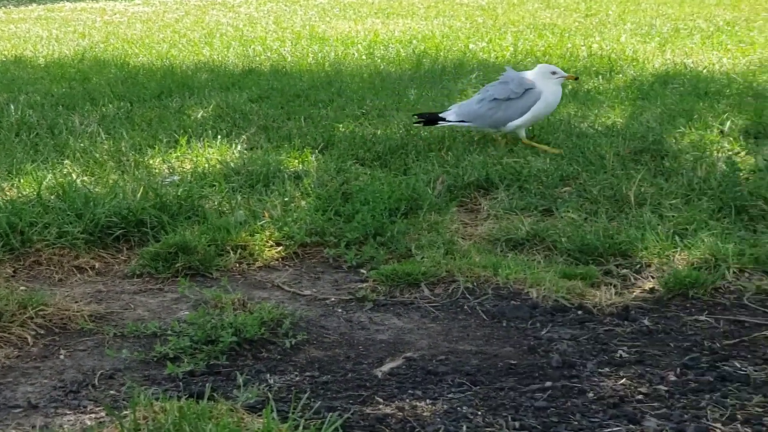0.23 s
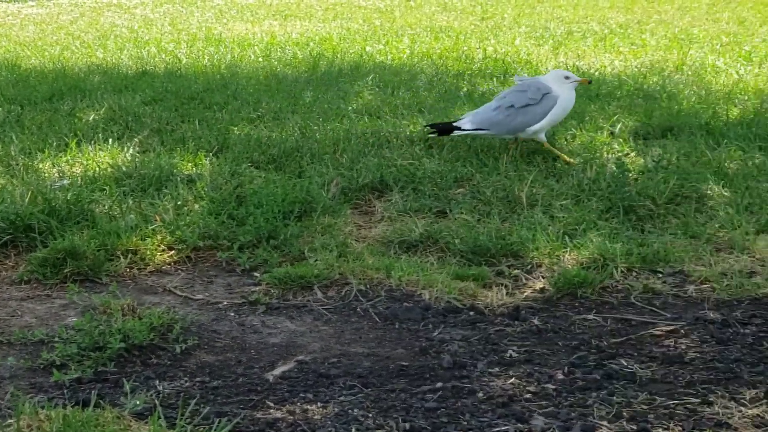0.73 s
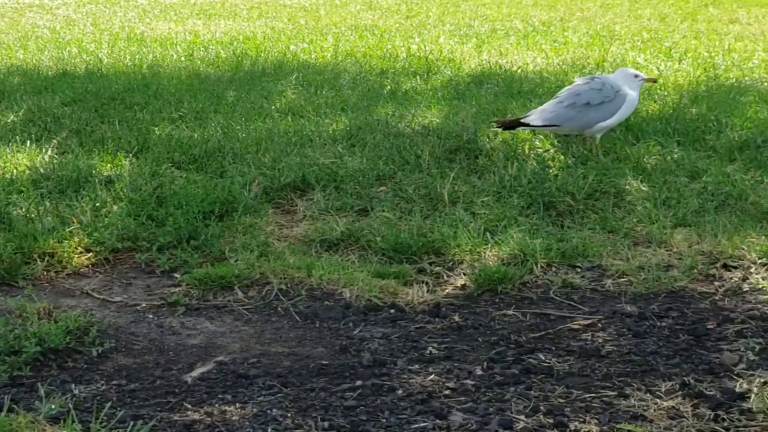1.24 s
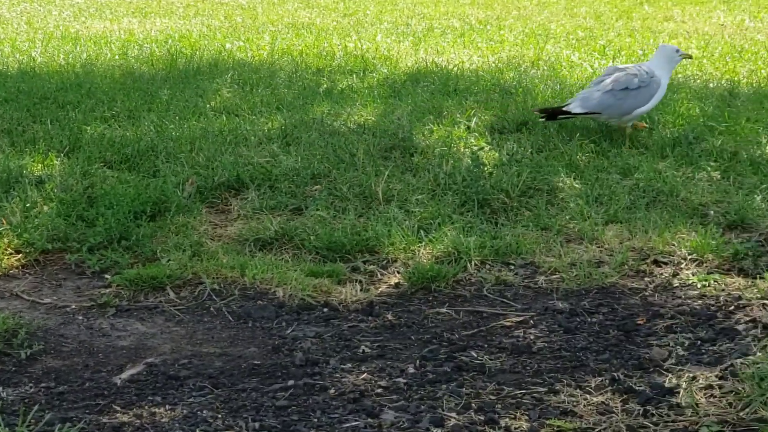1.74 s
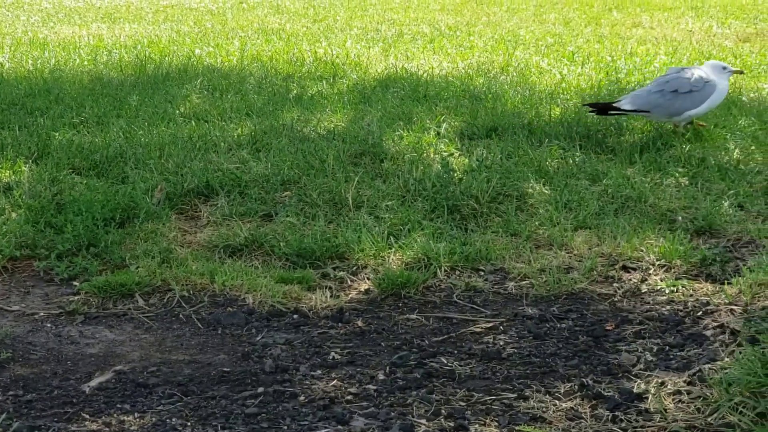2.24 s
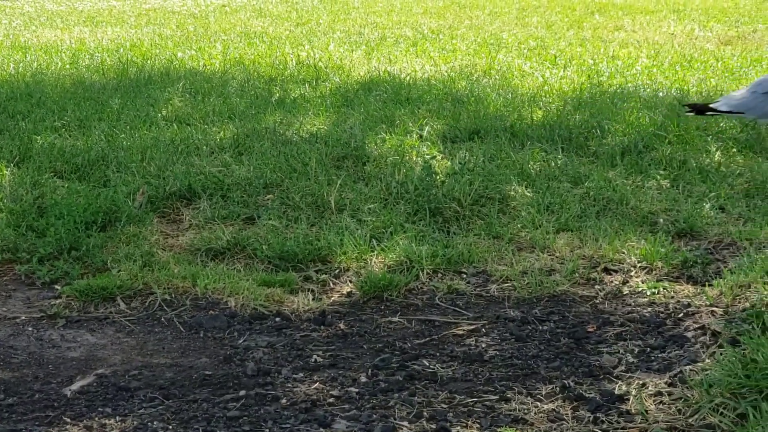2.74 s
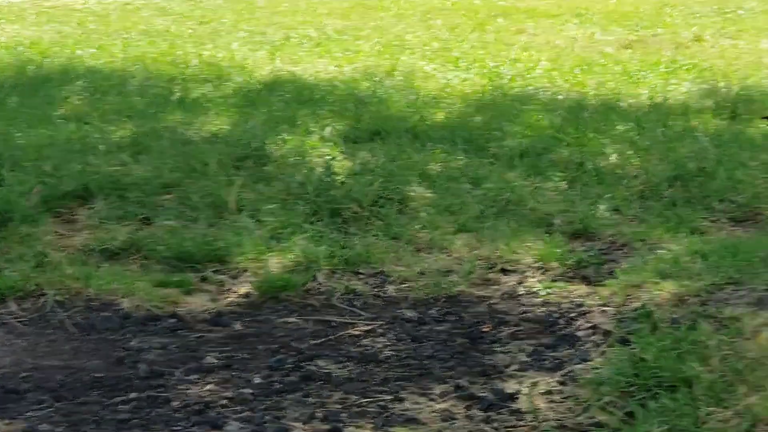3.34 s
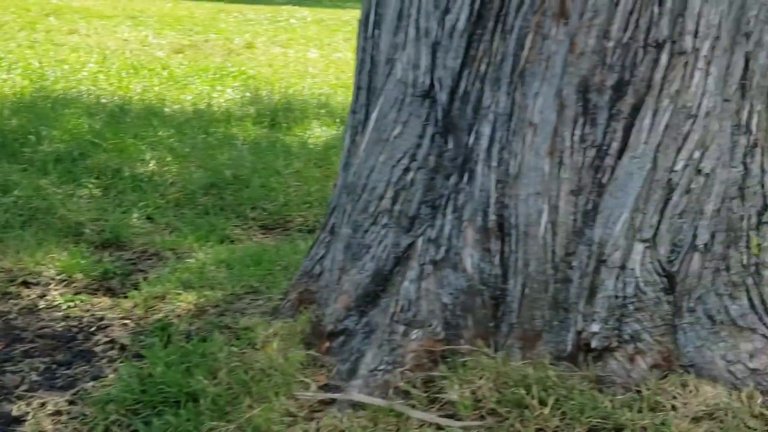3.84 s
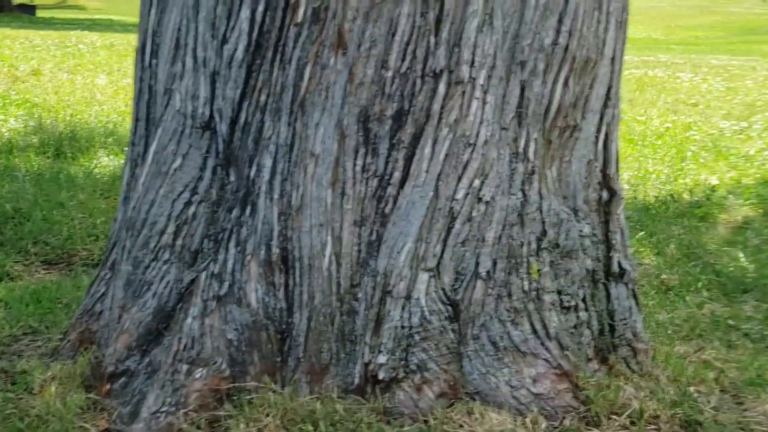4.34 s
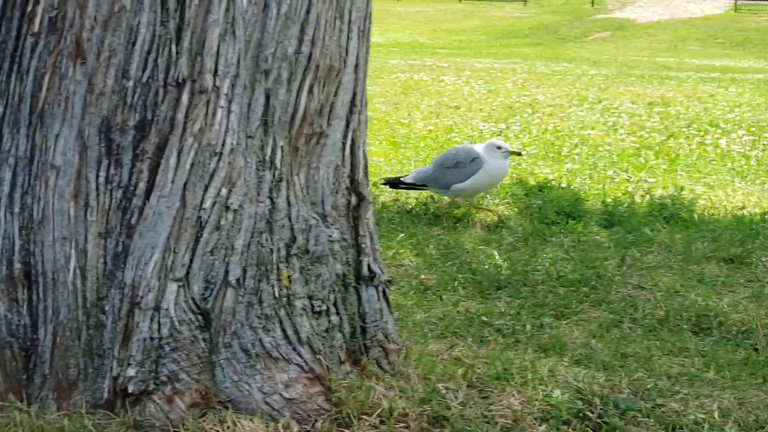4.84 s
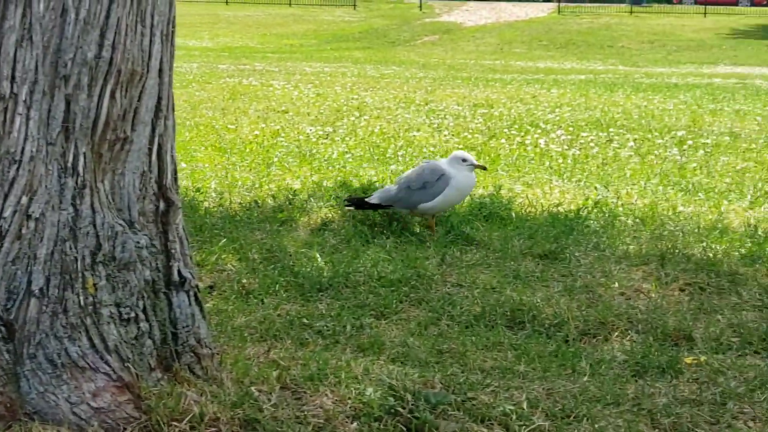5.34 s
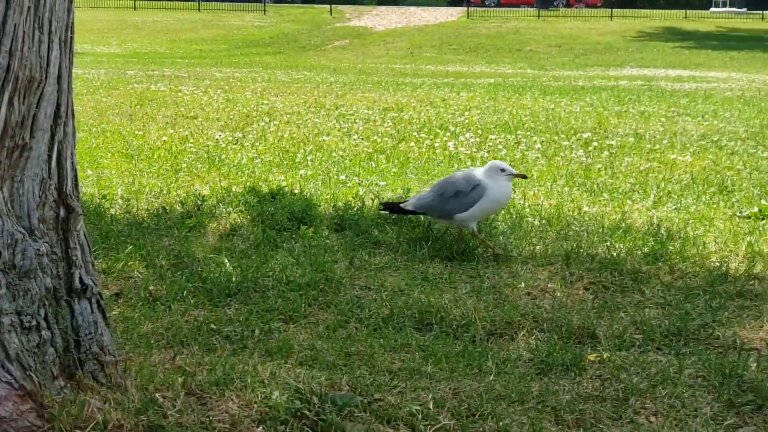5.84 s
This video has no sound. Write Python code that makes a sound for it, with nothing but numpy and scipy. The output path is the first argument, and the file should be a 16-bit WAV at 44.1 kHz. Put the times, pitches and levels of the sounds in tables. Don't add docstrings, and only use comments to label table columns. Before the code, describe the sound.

Wind thumps the microphone on a breezy lawn while sparrows chirp far off and a nearby gull calls twice, briefly, the second call fainter and hoarser.

```python
import sys
import numpy as np
from scipy import signal
from scipy.io import wavfile
from scipy.ndimage import uniform_filter1d

SR = 44100
rng = np.random.default_rng(int(sys.argv[2]) if len(sys.argv) > 2 else 0)


def generate_wav(sig):
    pcm = np.round(np.clip(np.atleast_2d(sig).T, -1, 1) * 32767).astype(np.int16)
    wavfile.write(sys.argv[1], SR, pcm)


def boost(x):
    u = np.asarray(x, float) / 20
    return 10 ** u


N = 268789
TIME = np.arange(N) / SR

# (time [s], pitch [Hz], effort [dB])
GULL_ONSET = [(1.571, 444, -60), (1.582, 478, -52), (1.592, 503, -39), (1.599, 512, -42), (1.603, 530, -46),
              (1.612, 580, -44)]
GULL_RISE = [(1.606, 568, -41), (1.613, 584, -37.5), (1.634, 585, -35.5), (1.641, 643, -40),
             (1.646, 640, -55)]
GULL_CRY = [(1.639, 802, -36.5), (1.661, 770, -35.5), (1.666, 762, -52), (1.671, 753, -34),
            (1.68, 741, -36), (1.688, 731, -53), (1.704, 718.4, -33.5), (1.735, 721, -38),
            (1.748, 765, -36)]
GULL_DROP = [(1.742, 380.5, -43), (1.764, 403.6, -43.5), (1.8, 375.3, -43.5), (1.817, 360, -47),
             (1.835, 356, -44), (1.856, 344, -48), (1.869, 330, -55)]
GULL_FLICK = [(1.843, 700, -50), (1.862, 588, -44), (1.886, 535, -46), (1.892, 572, -47), (1.925, 540, -58)]
GULL_OPENING = [(3.17, 600, -57), (3.19, 670, -50), (3.22, 715, -45), (3.235, 735, -56), (3.255, 750, -52),
                (3.285, 750, -57)]
GULL_MOAN = [(3.22, 378, -46), (3.236, 376, -44), (3.3, 360, -47), (3.34, 342, -43), (3.386, 330, -41),
             (3.422, 330, -49), (3.454, 333, -43.5), (3.48, 330, -55)]
GULL_SINK = [(3.425, 920, -60), (3.468, 840, -49), (3.5, 790, -53)]
GULL_CATCH = [(3.492, 514, -49), (3.503, 499, -47), (3.535, 450, -56)]
# (partial the beak is tuned to [number], treble at the start [dB],
# treble fade [dB/s], even partials [dB], rasp [0-1])
GULL_VOICES = [
    (3.75, 7, 10, -4.5, 0.25),
    (3.05, 5.5, 40, 5.5, 0.2),
    (1.86, 8, 202, 0.5, 0.06),
    (2.8, 0, 35, 3, .07),
    (1.77, -21, 10, 5, 0.45),
    (1.05, -12, 1, 6, .2),
    (3.0, -2, 10, -10, .36),
    (0.92, -18, 1, -7, 0.22),
    (2.27, -18, 100, -3, .1),
]
# (centre [Hz], width [Hz], level [dB])
THROAT_MODES = [(1870, 147, -1), (2470, 130, -18), (2620, 130, -10.5), (3070, 870, -14), (3990, 250, -9.5),
                (4750, 150, -10.5), (5360, 200, -19)]
# (time of the falling note [s], stretch [ratio], top of the opening hook [Hz],
# hook level [dB], fall level [dB])
SPARROW_CHIRRUPS = [(.278, 1.27, 4450, -57, -58), (0.58, 0.83, 4860, -47, -52),
                    (1.377, 1.2, 4800, -63, -57.5), (1.957, 0.85, 4750, -57, -50.5),
                    (2.481, 1.1, 4450, -63, -58), (3.092, 0.75, 5100, -66, -50.5),
                    (3.494, 1.45, 4320, -67, -61), (3.581, 1.3, 4500, -58, -52),
                    (4.335, 1.1, 4480, -65, -50), (4.73, 1.23, 4450, -52, -49),
                    (5.457, 0.9, 4690, -51.5, -49), (6.066, 1.18, 4500, -45.5, -49.5)]
# (start [s], length [s], middle
# pitch [Hz], glide [Hz], level [dB])
FLOCK_NOTES = [(.27, 0.018, 5300, -450, -59), (4.328, 0.017, 5050, -600, -51),
               (0.572, 0.013, 3230, -200, -49), (0.708, 0.05, 4220, 300, -56),
               (.735, 0.055, 4080, 330, -61), (1.409, 0.03, 2990, 262, -51),
               (2.045, 0.016, 4400, 98, -57.5), (1.925, .03, 3980, 48, -59), (3.153, 0.035, 3960, 30, -57),
               (3.19, 0.036, 4680, 230, -56), (3.512, .022, 3200, 100, -48),
               (3.514, 0.058, 2900, -900, -51), (3.478, .035, 3950, -600, -57.5),
               (3.515, .05, 3550, -250, -55), (3.9, .03, 3250, -150, -55), (3.605, 0.022, 3700, -100, -58),
               (3.472, .02, 4150, 300, -59), (3.495, 0.0252, 2600, -500, -60),
               (3.625, 0.023, 3750, -150, -52), (3.714, 0.03, 3530, 195, -56.5),
               (4.128, 0.0089, 4000, -1700, -50.5), (4.145, 0.037, 2450, 170, -56.5),
               (5.2, .013, 3850, 650, -56.5), (4.243, 0.022, 3700, -900, -53),
               (4.288, 0.0072, 3450, 300, -44.5), (4.714, 0.022, 3680, 297, -48.5),
               (4.735, .06, 3050, -950, -49), (4.726, .025, 3950, -900, -49), (4.735, 0.04, 3700, -58, -52),
               (4.795, 0.024, 3750, 400, -61), (4.185, 0.016, 2480, -50, -57),
               (5.614, 0.032, 4050, -81, -54.5), (5.645, 0.03, 4030, 60, -62),
               (5.675, 0.023, 4250, 100, -59), (4.7, .02, 3000, 50, -59), (5.692, 0.0267, 3500, -800, -52),
               (5.69, .02, 5300, 0, -59), (5.395, .025, 2900, -300, -55)]
# (start [s], length [s],
# middle pitch [Hz], glide [Hz], level [dB])
FAR_WHISTLES = [(.345, .115, 3260, 50, -58), (2.675, .125, 3500, -30, -61.5), (2.68, .11, 3200, -30, -63),
                (2.695, .08, 2910, -20, -67), (2.69, .09, 3790, -40, -65), (2.69, .08, 4090, -30, -69),
                (2.805, .21, 4310, 10, -63.5), (2.87, .07, 4320, 0, -72), (2.99, .06, 4300, 0, -72),
                (2.895, .05, 3070, -50, -66), (1.94, .06, 1860, 0, -62)]
# (start [s], end [s], middle pitch [Hz], level [dB])
FAR_TWITTER = [(3.48, 3.56, 3600, -59), (3.59, 3.68, 3700, -57), (4.34, 4.44, 3550, -54.5),
               (4.28, 4.34, 4500, -59), (4.73, 4.82, 3700, -53), (4.4, 4.7, 2500, -65),
               (5.3, 5.42, 2260, -66), (5.45, 5.62, 2900, -57), (5.8, 5.95, 2540, -66),
               (1.93, 2.02, 3700, -58)]
# (time [s], peak [dB], left-right difference [dB])
GRASS_TICKS = [(0.1775, -44, 12.5), (4.1074, -54, 4), (4.1135, -38, 2.5), (4.1295, -41, 6),
               (4.1364, -58, 3), (4.1832, -50, 1.5), (5.3244, -43, 2.5), (5.3844, -49, 3.0),
               (5.4715, -38, 12), (5.5194, -42, 5.5), (5.668, -35, 11), (6.0781, -41, 12)]
# (start [s], end [s], level [dB])
GRASS_RUSTLES = [(4.1, 4.22, -70), (4.324, 4.42, -68), (5.296, 5.55, -71), (5.66, 5.733, -75),
                 (5.797, 5.86, -70), (6.052, 6.091, -67)]
# (time [s], left level [dB], right level [dB])
GUSTS_ON_PORTS = [(0.1, -36, -38.5), (0.36, -29.5, -36), (0.531, -34.5, -39), (0.6, -25.5, -35.5),
                  (0.78, -28, -35), (0.87, -19, -37), (0.94, -19.5, -39), (1.02, -60, -38),
                  (1.55, -44, -39), (1.88, -43.5, -39), (2.3, -35.5, -39.5), (2.51, -70, -39.5),
                  (2.72, -39, -37.5), (3.9, -44.5, -40), (4.4, -38.5, -39.5), (5.5, -37.5, -38.5),
                  (5.87, -49, -42), (6.08, -52, -37)]
# (frequency [Hz], level [dB per Hz])
GUST_COLOUR = [(12, -42), (20, -44), (38, -1), (53, 4.5), (138, -6.5), (210, -11.5), (369, -33), (428, -30),
               (468, -33), (700, -57), (910, -76), (1540, -120)]
# (frequency [Hz], level [dB per Hz])
BREEZE_COLOUR = [(12, -42), (20, -22), (48, 2.5), (68, 2), (242, -10), (443, -28), (500, -25.5), (650, -41),
                 (1100, -120)]
# (time [s], likeness [0-1])
PORT_LIKENESS = [(0, 1), (1.5, 0.47), (3, 0.58), (4, 0.92), (6.09, 1)]
# (time [s], peak [dB], frequency [Hz])
EDDY_SLAPS = [(.565, -17.5, 226), (0.608, -13.5, 108), (0.675, -17.5, 139), (0.701, -19, 166),
              (0.729, -19, 227), (.752, -21.5, 302), (.835, -13.5, 190), (0.854, -14.5, 217), (.9, -14, 71),
              (.924, -17.5, 175), (0.946, -22, 120), (.957, -40, 200), (0.997, -20.5, 125)]
# (time [s], peak [dB], frequency [Hz], left-right [dB])
AIR_PUFFS = [(1.225, -27.5, 93, -1), (1.318, -30, 109, -5), (1.516, -27.5, 98, -1), (1.612, -31, 77, -12),
             (1.848, -25.5, 103, 0), (1.937, -28.5, 85, 1), (2.054, -26.5, 101, -15),
             (2.132, -29.5, 89.6, -1), (2.16, -26, 112, -1), (2.256, -31.5, 126, 1), (2.353, -31, 95, -1),
             (2.692, -29, 106, 1), (2.818, -29.0, 107, 0.5), (2.875, -32, 120, 3), (3.016, -36, 115, 2),
             (3.094, -25.5, 108, -6), (3.166, -25.5, 85.5, -2), (3.247, -27, 105, 2),
             (3.298, -29.5, 129, -4), (3.34, -27, 84.5, -2), (3.504, -32, 120, -1), (3.579, -29.5, 85, 2),
             (3.741, -28.5, 119, 0.5), (4.08, -30, 91, 5), (4.108, -30.5, 102, 1), (4.188, -28.5, 79, 2),
             (4.228, -31, 115, 1), (4.284, -31.0, 162, 0), (4.335, -29.5, 126, 2), (4.389, -32, 97, 2),
             (4.459, -29, 103, 0), (4.494, -28.5, 101, 0), (4.534, -28, 75, 0), (4.586, -27, 85, 0),
             (4.714, -31, 73.6, 0), (4.77, -33, 110, -1), (4.837, -27.5, 100, 0), (4.925, -28, 112, 0),
             (4.975, -36, 113, -10), (5.029, -27, 106, 0), (5.127, -28, 93, 1), (5.174, -31, 95, 3),
             (5.286, -33, 103, 1), (5.414, -33.5, 140, 0), (5.445, -32, 115, 0), (5.483, -35, 111, -2),
             (5.512, -25, 80.5, -1), (5.629, -30, 101, 2), (5.922, -32, 98, 6), (6.018, -29.0, 146, 0.5)]
# (time
# [s], level [dB])
BREEZE_LEVEL = [(0.0, 1.5), (0.71, 5), (0.98, -1), (1.49, -2), (1.75, 0.5), (1.9, -1.5), (2.15, -2),
                (3.07, -2), (3.36, 2.5), (3.51, 2), (4.0, 0.9), (4.24, 2), (5.44, 0.5), (6.0, -1.5)]
# (frequency [Hz], level [dB per Hz])
TOWN_COLOUR = [(150, -7.5), (250, -2), (455, -11.5), (636, -11), (701, -9.5), (1040, -8), (1690, -14),
               (2020, -13), (2750, -15), (3900, -17.5), (4870, -25), (7000, -52), (9100, -45),
               (15400, -120)]
# (frequency [Hz], level [dB per Hz])
ENGINE_COLOUR = [(25, -120), (50, -14), (61, 0), (72, -14), (120, -120)]
# (frequency [Hz], level [dB per Hz])
LEAF_COLOUR = [(2940, -12.5), (5000, 5), (5960, 4), (7110, 3), (8350, 0.5), (9320, -5), (10900, -5),
               (13700, -15), (15600, -20)]
# (time [s], left-right difference [dB])
LEAF_LEAN = [(0, 14.5), (3.4, 9), (3.8, 4.5), (6.09, 8)]
# (frequency [Hz], share [ratio])
LEAN_SHARE = [(5000, 0.11), (8000, 0.86), (15000, 1.9)]

SIDE_LAG = 21


def evened(x):
    return x / np.sqrt(np.mean(x ** 2) + 1e-20)


def read(points, hz):
    f, value = np.transpose(points)
    return np.interp(np.log(hz + 1), np.log(f + 1), value)


def follow(points, t):
    s, *columns = np.transpose(points)
    return np.array([np.interp(t, s, column) for column in columns])


def add(mix, s, sound):
    part = mix[round(s * SR):][:len(sound)]
    part += sound[:len(part)]


def smooth(x, width, axis=-1):
    return uniform_filter1d(uniform_filter1d(x, width, axis=axis), width, axis=axis)


def wobble(count, span):
    return evened(smooth(rng.standard_normal(count), max(int(span), 2)))


def band_noise(count, order, low_hz, high_hz):
    band = signal.butter(order, [low_hz, high_hz], "band", fs=SR)
    return signal.lfilter(*band, rng.standard_normal(count))


def sides(pan_db):
    return boost(np.array([pan_db / 2, -pan_db / 2]))


def register(rows, beak_partial, bright_db, fade, even_db, rasp):
    dullest_db, rasp_grows_s = -18, 0.16
    throb_hz, throb_crest_s, haze_db = 39, 3.36, -7.5
    start = rows[0][0]
    t = np.arange(start, rows[-1][0], 1 / SR)
    hz, effort_db = follow(rows, t)
    rasp = rasp * np.minimum(0.35 + (t - start) / rasp_grows_s, 1)
    jitter = (0.002 + 0.035 * rasp) * wobble(len(t), 150)
    turns = np.cumsum(hz * (1 + jitter)) / SR

    k = np.arange(1, 15)[:, None]
    partial_hz = k * hz
    beak = 1 / (1 + ((partial_hz - beak_partial * hz) / 260) ** 2)
    windpipe = boost(-11.5) * np.exp(-((partial_hz - 740) / 170) ** 2)
    throat = sum(boost(db) / (1 + (2 * (partial_hz - f) / width) ** 2) for f, width, db in THROAT_MODES)
    treble = boost(np.maximum(bright_db - fade * (t - start), dullest_db)) * throat
    weight = beak * (partial_hz > 480) + windpipe + treble
    weight = weight * boost(np.where(k % 2, 0, even_db))
    weight = weight / np.sqrt((weight ** 2).sum(0) / 2)
    stack = (weight * np.sin(2 * np.pi * (k * turns + rng.random((14, 1))))).sum(0)

    beats = 0.6 * np.sin(2 * np.pi * 92 * t)
    beats = beats + 1.7 * np.cos(2 * np.pi * throb_hz * (t - throb_crest_s))
    flutter = 1 + rasp * (beats + 0.9 * wobble(len(t), 100))
    breath = evened(band_noise(len(t), 3, 1300, 3400))
    voice = stack * flutter + boost(haze_db) * np.clip(2 * rasp, 0, 1) * breath
    return start, boost(effort_db) * voice * signal.windows.tukey(len(t), 0.12)


def gull_calls():
    out = np.zeros(N)
    registers = (GULL_ONSET, GULL_RISE, GULL_CRY, GULL_DROP, GULL_FLICK,
                 GULL_OPENING, GULL_MOAN, GULL_SINK, GULL_CATCH)
    for rows, voice in zip(registers, GULL_VOICES):
        add(out, *register(rows, *voice))
    return out


def chirp(s, length, from_hz, middle_hz, to_hz, db, upper_db=-11):
    u = np.linspace(-1, 1, round(length * SR))
    hz = middle_hz + (to_hz - from_hz) / 2 * u + ((to_hz + from_hz) / 2 - middle_hz) * u ** 2
    travel_hz = abs(middle_hz - from_hz) + abs(to_hz - middle_hz)
    haste = np.clip(travel_hz / length / 13500, 0.15, 1)
    burr, upper, swell = (wobble(N // 20, span)[:len(u)] for span in (70, 90, 110))
    tone = np.sin(2 * np.pi * np.cumsum(hz * (1 + 0.016 * haste * burr)) / SR)
    second = np.sin(2 * np.pi * np.cumsum(hz + 430 + 120 * upper) / SR)
    tone = tone + haste * boost(upper_db + 1.3 * upper) * second
    return s, boost(db + 6 + 1.5 * haste * swell) * tone * signal.windows.tukey(len(u), 0.7)


def chirrup(s, stretch, top_hz, hook_db, fall_db):
    hook_s, slash_s, fall_s, tail_s = 0.028 * stretch, 0.016 * stretch, 0.024 * stretch, 0.036 * stretch
    hook = (s - 0.73 * hook_s, hook_s, 0.93 * top_hz, top_hz, 0.98 * top_hz, hook_db, -1)
    slash = (s - 0.6 * slash_s, slash_s, 5300, 5050, 4650, fall_db - 11, -12)
    fall = (s, fall_s, 4500, 3880, 4000, fall_db, -4)
    tail = (s + 0.029 * stretch, tail_s, 3980, 3830, 3620, fall_db - 4, -12)
    return hook, slash, fall, tail


def twitter():
    out = np.zeros(N)
    bodies = [(s - 0.01, s + 0.079 * stretch, 3900, db - 8) for s, stretch, _, _, db in SPARROW_CHIRRUPS]
    for start, end, hz, db in FAR_TWITTER + bodies:
        count = round((end - start) * SR)
        band = band_noise(N // 10, 2, hz * 0.864, hz * 1.09)
        lumps = boost(4 * wobble(N // 10, 120))
        grain = evened((band * lumps)[:count])
        add(out, start, boost(db) * grain * signal.windows.tukey(count, 0.6))
    return out


def sparrow_flock():
    out = twitter()
    for row in SPARROW_CHIRRUPS:
        for note in chirrup(*row):
            add(out, *chirp(*note))
    for s, length, hz, glide, db in FLOCK_NOTES + FAR_WHISTLES:
        add(out, *chirp(s, length, hz - glide / 2, hz, hz + glide / 2, db))
    return out


def trees(x, t60, wet_db, lag):
    size = SR // 3
    taps = np.zeros((2, size))
    at = np.arange(200, size - 40, 40) + rng.integers(0, 40, (2, (size - 201) // 40))
    np.put_along_axis(taps, at, rng.choice([-1., 1.], at.shape), 1)
    taps = taps * boost(-60 * np.arange(size) / SR / t60)
    tail = signal.fftconvolve(x[None], taps / np.linalg.norm(taps[0]), axes=1)[:, :N]
    return np.array([x, np.roll(x, lag)]) + boost(wet_db) * tail


def grass():
    out, t = np.zeros((2, N)), np.arange(600) / SR
    for s, db, pan_db in GRASS_TICKS:
        snap = band_noise(len(t), 2, 2800, 12500) * boost(-60 * t / 0.0047)
        ring = 0.5 * np.sin(2 * np.pi * 7870 * t) * boost(-60 * t / 0.02)
        for port in range(2):
            add(out[port], s, (snap + ring) * boost(db - 9) * sides(pan_db)[port])
    crackle = rng.random((2, N)) < 2500 / SR
    sizes_db = 2.5 * np.minimum(rng.exponential(1, (2, N)), 3)
    swarm = crackle * rng.standard_normal((2, N)) * boost(sizes_db)
    swarm = evened(signal.lfilter(*signal.butter(1, [8500, 14000], "band", fs=SR), swarm))
    stir = np.zeros(N)
    for start, end, db in GRASS_RUSTLES:
        stir += boost(db) * np.exp(-(2 * (2 * TIME - start - end) / (end - start)) ** 2 / 2)
    return out + swarm * stir * sides(8.9)[:, None]


def noise(spectrum, same, patchy_db, size, lean_db=None):
    hop, hz = size // 4, np.fft.rfftfreq(size, 1 / SR)
    a, b, c, d, patches = rng.standard_normal((N // hop + 5, len(hz), 5)).T
    patches = uniform_filter1d(uniform_filter1d(patches, size=10, axis=0), size=10, axis=1)
    patches = evened(patches)
    aside = np.clip((hz - 600) / 700, 0, 1)
    late = np.exp(-2j * np.pi * hz * aside * SIDE_LAG / SR)[:, None]
    left = a + 1j * b
    right = same * late * left + np.sqrt(1 - same ** 2) * (c + 1j * d)
    z = np.array([left, right]) * boost(read(spectrum, hz)[:, None] + patchy_db * patches)
    scale = np.sqrt(np.mean(abs(z) ** 2))
    if lean_db is not None:
        lean_now = np.interp(np.arange(z.shape[2]) * hop, np.arange(N), lean_db)
        z = z * sides(read(LEAN_SHARE, hz)[:, None] * lean_now)
    return signal.istft(z / scale, nperseg=size, noverlap=size - hop)[1][:, :N] / np.sqrt(size)


def wind():
    level_db = follow(GUSTS_ON_PORTS, TIME)
    hard = np.clip((level_db + 37) / 8, 0, 1)
    calm_air = evened(noise(BREEZE_COLOUR, 0, 1.8, size=2048))
    gust_air = evened(noise(GUST_COLOUR, 0, 1.5, size=2048))
    eddies = np.sqrt(1 - hard) * calm_air + np.sqrt(hard) * gust_air
    own_lumps = np.array([wobble(N, 500), wobble(N, 340)])
    eddies = eddies * boost(2.47 * own_lumps + 2.0 * wobble(N, 970))
    alike = follow(PORT_LIKENESS, TIME)[0]
    ports = np.array([eddies[0], alike * eddies[0] + np.sqrt(1 - alike ** 2) * eddies[1]])
    ports = ports / np.sqrt(smooth(ports ** 2, 5000, axis=1))
    return boost(level_db + 0.8 - 2.5 * (1 - hard)) * ports


def slaps():
    out = np.zeros((2, N))
    for s, db, hz in EDDY_SLAPS:
        u = np.arange(-600, 600) / SR * hz
        add(out[0], s - 600 / SR, boost(db) * np.cos(2 * np.pi * u - 0.6) * np.exp(-(u / 0.61) ** 2))
    for s, db, hz, pan_db in AIR_PUFFS:
        u = np.arange(-900, 900) / SR * hz
        swing = rng.random()
        puff = boost(db - 1.5) * np.cos(2 * np.pi * (u + swing)) * np.exp(-(u / 0.56) ** 2)
        for port in range(2):
            add(out[port], s - 900 / SR, puff * min(sides(2 * pan_db)[port], 1))
    return out


def surroundings():
    hum_db, engine_db, leaves_db = -49, -46, -64.5
    breeze_db = follow(BREEZE_LEVEL, TIME)[0]
    flicker_db = 0.7 * wobble(N, 1500)
    hum = evened(noise(TOWN_COLOUR, 0.33, 1.0, size=1024)) * boost(hum_db + breeze_db + flicker_db)
    engine = evened(noise(ENGINE_COLOUR, 0.37, 1.3, size=4096)) * boost(engine_db)
    leaves = evened(noise(LEAF_COLOUR, 0.043, 0.85, size=512, lean_db=follow(LEAF_LEAN, TIME)[0]))
    hiss_db = leaves_db + 0.76 * breeze_db + 0.68 * TIME + 0.38 * wobble(N, 600)
    return hum + engine + leaves * boost(hiss_db)


def scene():
    near = trees(gull_calls(), t60=0.15, wet_db=-11, lag=-3)
    far = trees(sparrow_flock(), t60=0.22, wet_db=-5, lag=SIDE_LAG) * sides(-2.5)[:, None]
    return near + far + grass() + wind() + slaps() + surroundings()


def band_limit(x):
    return signal.sosfilt(signal.butter(12, 15790, fs=SR, output="sos"), x)


def record(dry):
    heard = signal.lfilter(*signal.butter(2, 38, "high", fs=SR), dry)
    treble_edge = signal.firwin(511, 15800, window=("kaiser", 9), fs=SR)
    heard = signal.oaconvolve(heard, treble_edge[None], "same")
    ceiling = 0.38
    mix = ceiling * np.tanh(heard / ceiling)
    return band_limit(mix)


dry = scene()
out = record(dry)
generate_wav(out)
```